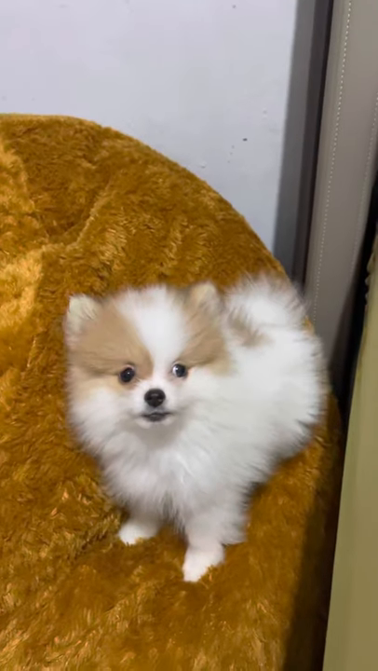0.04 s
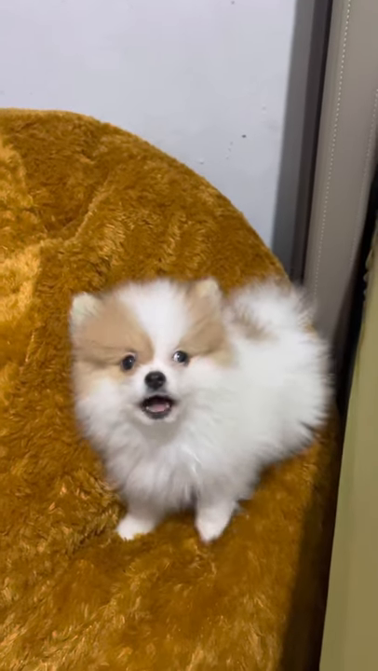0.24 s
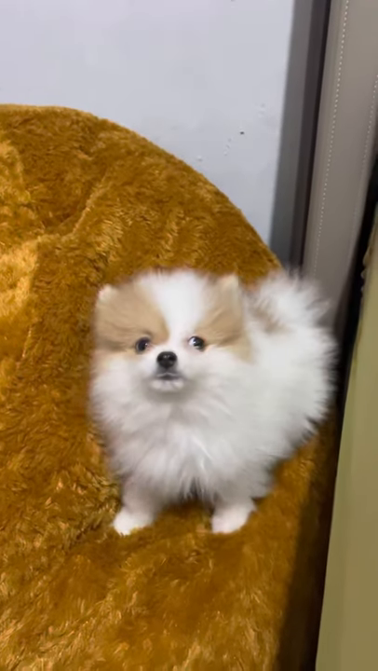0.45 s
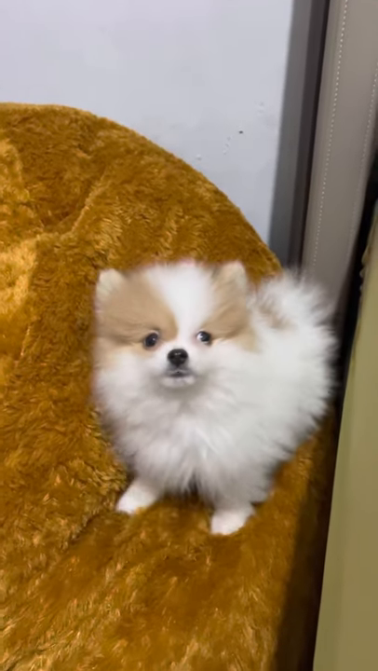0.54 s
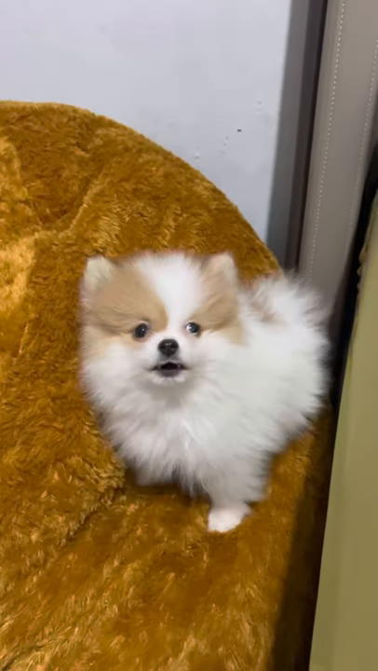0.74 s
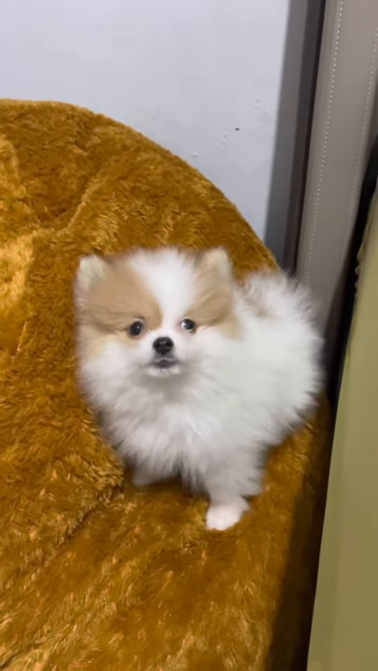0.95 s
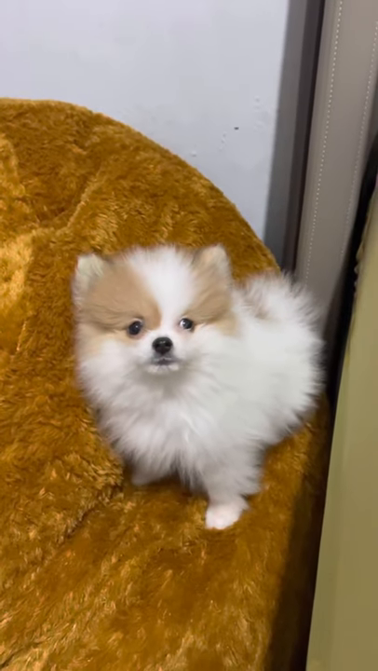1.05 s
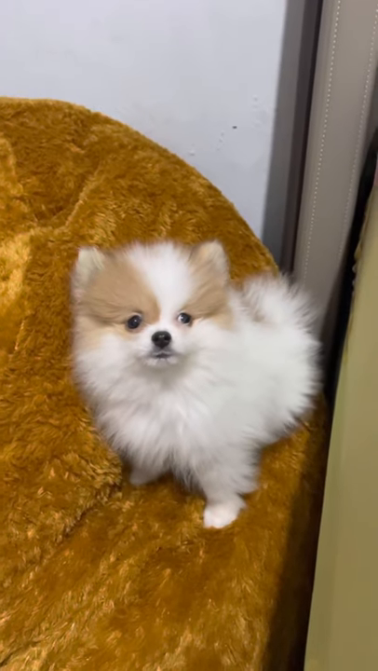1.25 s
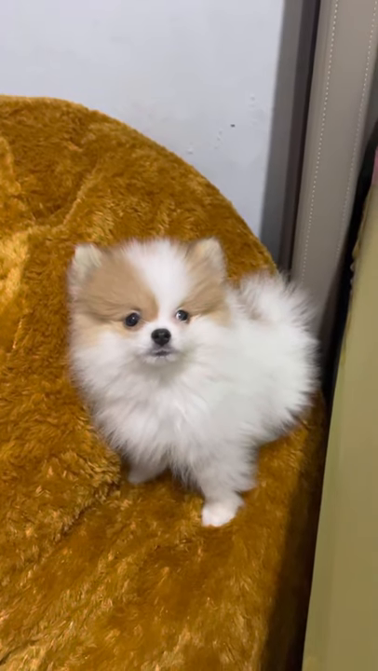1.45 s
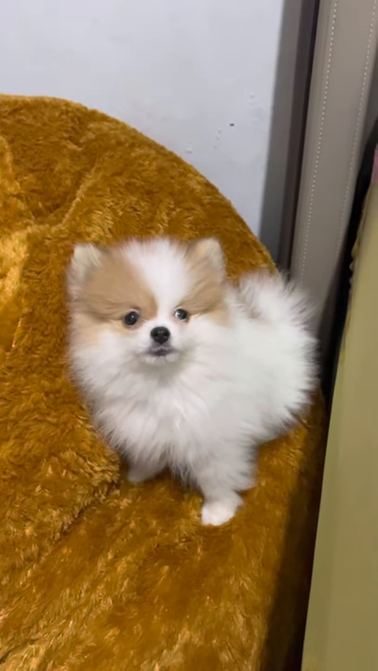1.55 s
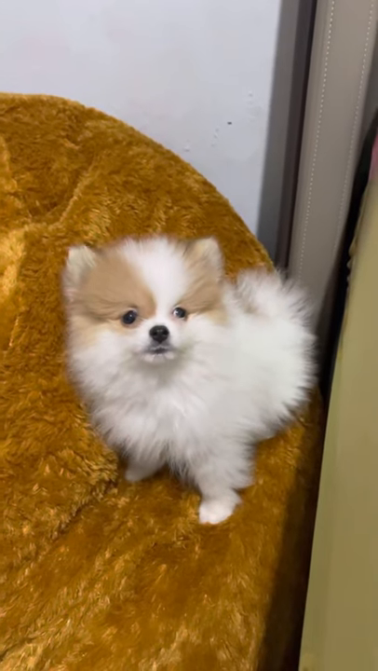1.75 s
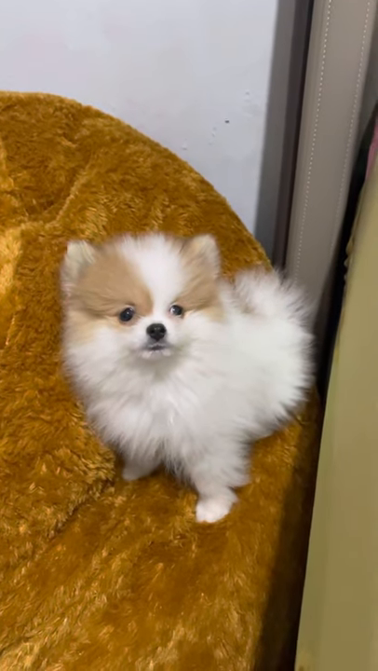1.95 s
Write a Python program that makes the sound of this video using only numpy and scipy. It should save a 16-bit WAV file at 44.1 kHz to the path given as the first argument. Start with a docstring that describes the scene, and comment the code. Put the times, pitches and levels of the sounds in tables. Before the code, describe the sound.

A small puppy yelps, squeals and whines in high-pitched cries, close by.

```python
"""A small puppy on a chair, close to the microphone in a quiet room; a faint appliance hum throughout.
A squeal is just ending at 0 s. At 0.2 s a thin squeal breaks down about an octave into a full cry,
flips back up as the mouth closes and trails into a low groan. From 0.7 to 1.1 s the puppy whines,
mouth nearly shut. At 1.6 s comes a shorter, softer yelp, then a falling squeal and a last groan.
The voice is jittering vocal-fold partials shaped by throat and mouth, plus turbulent hiss."""
import sys
import numpy as np
from scipy import signal
from scipy.fft import rfft, irfft, next_fast_len
from scipy.io import wavfile
from scipy.ndimage import uniform_filter1d

SR = 44100
rng = np.random.default_rng(int(sys.argv[2]) if len(sys.argv) > 2 else 0)


def unload_wav(signal):
    """Save mono or channel-first audio to the path in sys.argv[1] as 16-bit WAV at rate SR, clipped to [-1, 1]."""
    wavfile.write(
        sys.argv[1],
        SR,
        np.round(np.clip(np.atleast_2d(signal).T, -1, 1) * 32767).astype(np.int16),
    )


N = 88200
LEAD_SAMPLES = SR // 8  # the first cry starts before time zero

# Voice curves, one per unbroken stretch; the whine is a single curve. Each row: time in seconds,
# pitch in Hz, level in dB, roughness from 0 to 1, brightness in dB per octave.
YELP_CURVES = [
    [(-.1, 1789, -14, .6, -6.5), (-.003, 1768, -27, 0.25, -1.5), (.02, 1177, -24.5, 0.27, -2.5)],
    [(.208, 1124, -22.5, 0.25, 0), (.228, 1180, -14, .05, 1)],
    [(.228, 655.9, -13, 0.56, -5), (.236, 664.5, -12.5, .05, -4.5), (.268, 732.2, -12, 0, 0.5),
     (.313, 763.4, -15.5, 0.07, 0.5), (.321, 800.3, -13.5, 0.56, -5.5), (.34, 785.7, -16.5, .6, 0),
     (.351, 786.2, -15.5, .14, -6.5), (.37, 733.3, -19, .14, -11.5)],
]
SQUEAL_CURVES = [
    [(.37, 1329, -18, .25, 6.5), (.379, 1322, -20.5, .05, -3.5), (.394, 1295, -25.5, .09, -3)],
    [(1.69, 1119, -23, .25, 11.5), (1.7, 1133, -24.5, .12, 6), (1.738, 877.5, -24.5, 0.12, -3),
     (1.765, 747.9, -29, .08, -5.5), (1.781, 767, -30.5, 0.46, -2.5)],
    [(1.789, 896.9, -32.5, .08, -5), (1.807, 881.2, -41, .1, -2.5)],
]
GROAN_CURVES = [
    [(.423, 463.7, -44.5, 0.11, -7), (.455, 354, -39, 0.074, -2), (.512, 293.8, -41, 0.44, -14.5),
     (.535, 342.9, -40.5, 0.51, -22)],
    [(1.82, 330.5, -43, 0.39, 0), (1.862, 393.2, -35.5, 0.17, 0.5), (1.9, 449.4, -41, 0.38, -3),
     (1.955, 425.6, -38.5, 0.532, 2.5), (2.004, 372.6, -44, 0.38, -10)],
]
WHINE_CURVE = [(.728, 1091, -40.5, 0.24, 0.5), (.757, 1114, -25, .13, 5), (.782, 1160, -32.5, 0.15, 2),
               (.806, 1106, -32.5, .04, 0), (.832, 1053, -31, 0.029, 5.5), (.866, 1105, -34.5, .02, -4),
               (.9, 1064, -33, 0.018, 4.5), (.986, 1019, -33, .02, 2.5), (1.003, 832.2, -26.5, 0.02, 0.5),
               (1.104, 790.3, -32, 0.014, -1), (1.118, 748, -34.5, 0.57, -3)]
SHORT_YELP_CURVES = [
    [(1.641, 1098, -26.5, 0.36, 0.84), (1.649, 1075, -28, 0.68, 0.045)],
    [(1.649, 552.9, -22.5, 0.4, -3), (1.664, 547.6, -18.5, 0.082, 1), (1.676, 635.7, -21, 0.15, 0),
     (1.69, 725, -21, .3, -3.5)],
]
# Throat and mouth resonances per posture. Each row: frequency in Hz, relative gain in dB.
MOUTH_OPEN_DB = [(720, -28), (1100, -10), (1450, 1), (2150, -5.5), (3000, -8), (4700, -20), (5300, -9),
                 (6800, -11.5), (8300, -29.5)]
MOUTH_CLOSING_DB = [(1300, 0), (1700, -13), (2200, -4), (2750, -15), (3700, -30), (4450, -17), (4900, -36),
                    (6700, -26), (8000, -50)]
MOUTH_GROANING_DB = [(290, -5), (900, 5), (1250, -21.5), (8000, -60)]
MOUTH_SHUT_DB = [(800, 15), (1060, 7), (1170, -24.5), (1650, 7), (2320, -6.5), (2480, -27), (4400, -25),
                 (5500, -29.5), (6400, -20.5), (7800, -40)]
MOUTH_HALF_OPEN_DB = [(600, -17), (1100, -5.5), (1700, 7), (2250, -13.5), (3100, -5.5), (4900, -25.5),
                      (6300, -13.5), (8000, -38)]
# Open-mouth resonance, falling as the jaw closes. Each row: time in seconds, centre in Hz.
JAW_RESONANCE_HZ = [(.02, 2500), (.235, 3480), (.305, 2936), (.345, 1650)]
# Room decay. Each row: frequency in Hz, T60 in seconds.
ROOM_T60_S = [(300, 0.02), (1500, 1.0364), (10000, 0.7141)]
# Room tail strength. Each row: frequency in Hz, gain in dB.
ROOM_GAIN_DB = [(1500, -21.5), (3500, -26), (4400, -12), (6200, -23)]
# Appliance hum. Each row: frequency in Hz, level in dB, left minus right in dB.
HUM_LINES = [(111.05, -62, 0.5), (410.74, -63.5, 11), (510.15, -66, 13.5)]
# Air noise. Each row: frequency in Hz, relative spectral density in dB.
AIR_SPECTRUM_DB = [(25, -28.5), (65, 0), (110, -2), (160, -9.5), (450, -11), (4500, -42)]
# Microphone port balance. Each row: frequency in Hz, left minus right in dB.
PORT_BALANCE_DB = [(380, 6), (780, 8), (1290, 4), (4400, 0)]
# Microphone port phase. Each row: frequency in Hz, left lead in radians.
PORT_LEAD_RAD = [(200, 0), (780, -1.5), (1150, -.45), (4100, .3), (4650, 1.3), (5300, .4), (8300, 2.4)]
# Treble dip of both ports. Each row: frequency in Hz, gain in dB.
MIC_DIP_DB = [(7700, 0), (9400, -26), (11000, -26), (12300, -2)]

JITTER_BASE, JITTER_PER_ROUGHNESS, JITTER_HZ = 0.0013, 0.044, 150
SHIMMER_SCALE_DB, SHIMMER_HZ = 2.8, 30
RASP_WIDTH_HZ, RASP_EXPONENT = 307.34, .28
JAW_DB, JAW_WIDTH_HZ = 8, 470
HISS_LOW_HZ, HISS_HIGH_HZ, HISS_DB_PER_DB = 1500, 7000, 1.6
HALF_FADE_S, CHEST_CUTOFF_HZ, BAND_LIMIT_HZ = .003, 258.04, 15800
HUM_WAVER_DEPTH, HUM_WAVER_HZ = .4, 2.8
AIR_DB, AIR_PAN_DB = -59, 4
SIDES = np.array([[.5], [-.5]])  # left and right shares of a difference


def amp(db):
    """Decibels to gain."""
    return 10 ** (np.asarray(db) / 20)


def unit_rms(x):
    """Scales to rms 1."""
    return x / np.sqrt(np.mean(abs(x) ** 2) + 1e-20)


def lookup(table, hz):
    """Interpolates on a log-frequency axis."""
    table_hz, values = np.transpose(table)
    return np.interp(np.log(hz + 1), np.log(table_hz + 1), values)


def colour(x, response):
    """Filters by a function of frequency."""
    size = 2 * x.shape[-1]
    return irfft(rfft(x, size) * response(np.fft.rfftfreq(size, 1 / SR)), size)[..., :size // 2]


def stereo_noise(size, correlation):
    """White noise, partly alike left and right."""
    left, other = rng.standard_normal((2, size))
    return np.array([left, correlation * left + np.sqrt(1 - correlation ** 2) * other])


def wavering(count, size, hz):
    """Rows of complex random motion, rms 1, low-passed at hz."""
    length = next_fast_len(size + SR // 4)
    lowpass = 1 / np.sqrt(1 + (np.fft.fftfreq(length, 1 / SR) / hz) ** 10)
    spectrum = rng.standard_normal((count, length, 2)) @ [1, 1j]
    return unit_rms(np.fft.ifft(spectrum * lowpass))[:, :size]


def voice(curve, mouth, hiss_db, jaw_db=0):
    """One stretch of vocal-fold vibration: jittering, rasping partials shaped by throat and mouth."""
    times_s, *controls = np.transpose(curve)
    clock_s = np.arange(-LEAD_SAMPLES, N) / SR
    active = (clock_s > times_s[0] - HALF_FADE_S) & (clock_s < times_s[-1] + HALF_FADE_S)
    t = clock_s[active]
    pitch_hz, level_db, roughness, tilt_db_per_oct = (
        uniform_filter1d(np.interp(t, times_s, control), size=200) for control in controls)
    jitter = (JITTER_BASE + JITTER_PER_ROUGHNESS * roughness) * wavering(1, len(t), JITTER_HZ)[0].real
    pitch_hz = pitch_hz * (1 + jitter)
    cycles = np.cumsum(pitch_hz) / SR
    count = min(int(BAND_LIMIT_HZ / pitch_hz.min()), 26)
    harmonic = np.arange(1, count + 1)[:, None]
    partial_hz = harmonic * pitch_hz

    tilt_db = tilt_db_per_oct * np.log2(np.clip(partial_hz, 700, 5000) / 1000)
    jaw_hz = np.interp(t, *np.transpose(JAW_RESONANCE_HZ))
    peak_db = jaw_db * np.exp(-((partial_hz - jaw_hz) / JAW_WIDTH_HZ) ** 2)
    shimmer_db = SHIMMER_SCALE_DB * np.log(harmonic) * wavering(count, len(t), SHIMMER_HZ).real
    gains = amp(lookup(mouth, partial_hz) + tilt_db + peak_db + shimmer_db)
    gains *= partial_hz < BAND_LIMIT_HZ
    gains /= np.sqrt((gains ** 2).sum(0) / 2)

    rasp = np.clip(roughness * harmonic ** RASP_EXPONENT, 0, .95)
    skirts = wavering(count, len(t), RASP_WIDTH_HZ)
    partials = (np.sqrt(1 - rasp ** 2) + rasp * skirts) * np.exp(2j * np.pi * harmonic * cycles)
    dispersion = np.exp(-2j * np.pi * np.log2(partial_hz / 1000))  # throat delays low partials more
    tone = amp(level_db) * (gains * partials * dispersion).real.sum(0)
    hiss = amp(hiss_db + HISS_DB_PER_DB * level_db) * turbulence(cycles)  # fades faster than the tone

    edge_s = np.minimum(t - t[0], t[-1] - t)
    gate = np.sin(np.pi / 2 * np.clip(edge_s / (2 * HALF_FADE_S), 0, 1)) ** 2
    out = np.zeros(len(clock_s))
    out[active] = gate * (tone + hiss)
    return out


def turbulence(cycles):
    """Air noise at the vocal folds, one puff per cycle: steep below its band, gentle above."""
    def band(hz):
        ratio = hz / HISS_LOW_HZ
        return ratio ** 3 / np.sqrt((1 + ratio ** 6) * (1 + (hz / HISS_HIGH_HZ) ** 2))

    puffs = rng.standard_normal(len(cycles)) * (1 + np.cos(2 * np.pi * cycles) / 2)
    return unit_rms(colour(puffs, band))


def puppy():
    """Each cry through its mouth posture; the small body radiates little bass."""
    cries = sum(voice(curve, MOUTH_OPEN_DB, hiss_db=-19, jaw_db=JAW_DB) for curve in YELP_CURVES)
    cries += sum(voice(curve, MOUTH_HALF_OPEN_DB, hiss_db=-14) for curve in SHORT_YELP_CURVES)
    cries += sum(voice(curve, MOUTH_CLOSING_DB, hiss_db=-8) for curve in SQUEAL_CURVES)
    cries += voice(WHINE_CURVE, MOUTH_SHUT_DB, hiss_db=-21)
    cries += sum(voice(curve, MOUTH_GROANING_DB, hiss_db=-16) for curve in GROAN_CURVES)
    return signal.sosfilt(signal.butter(4, CHEST_CUTOFF_HZ, "highpass", fs=SR, output="sos"), cries)


def room(x):
    """Faint reflections, each band decaying at its own rate."""
    hz, time_s, bands = signal.stft(stereo_noise(SR, correlation=.4), SR, nperseg=256)
    t60_s = lookup(ROOM_T60_S, hz)[:, None]
    decay = amp(lookup(ROOM_GAIN_DB, hz)[:, None] - 60 * time_s / t60_s)
    energy_norm = np.sqrt(2 * np.log(1000) / t60_s / SR)
    tail = signal.istft(bands * decay * energy_norm, SR, nperseg=256)[1][:, :SR]
    return signal.fftconvolve(x[None], tail, axes=1)[:, :len(x)]


def air():
    """Low, steady rush of air."""
    rush = colour(stereo_noise(N, correlation=.8), lambda hz: amp(lookup(AIR_SPECTRUM_DB, hz)))
    return unit_rms(rush) * amp(AIR_DB + SIDES * AIR_PAN_DB)


def appliance_hum():
    """Three slowly wavering tones."""
    out = np.zeros((2, N))
    for hz, level_db, pan_db in HUM_LINES:
        waver = 1 + HUM_WAVER_DEPTH * wavering(1, N, HUM_WAVER_HZ)[0]
        line = np.exp(2j * np.pi * hz * np.arange(N) / SR) * waver
        out += unit_rms(line.real) * amp(level_db + SIDES * pan_db)
    return out


def scene():
    """Puppy and room at two microphone ports, the left nearer, over air and hum."""
    cries = puppy()
    direct = colour(cries, lambda hz: np.exp(1j * SIDES * lookup(PORT_LEAD_RAD, hz)))
    at_ports = colour(direct + room(cries), lambda hz: amp(SIDES * lookup(PORT_BALANCE_DB, hz)))
    return at_ports[:, LEAD_SAMPLES:] + air() + appliance_hum()


def record(dry):
    """Microphone treble dip, then band limit."""
    dipped = colour(dry, lambda hz: amp(lookup(MIC_DIP_DB, hz)))
    lowpass = signal.firwin(511, BAND_LIMIT_HZ, window=("kaiser", 9), fs=SR)
    return signal.oaconvolve(dipped, lowpass[None], "same")


dry = scene()
out = record(dry)
unload_wav(out)
```